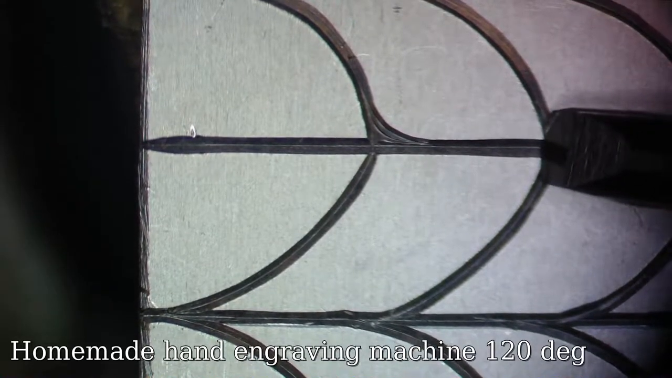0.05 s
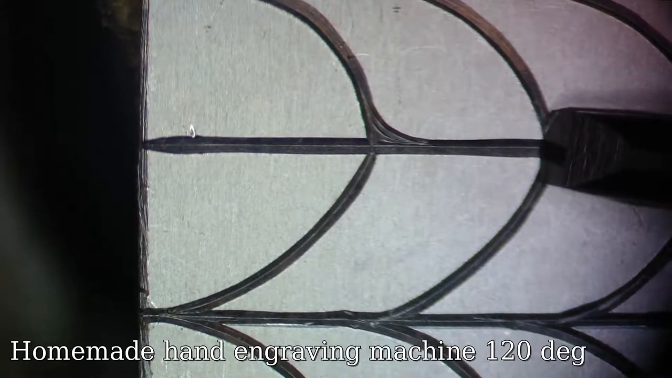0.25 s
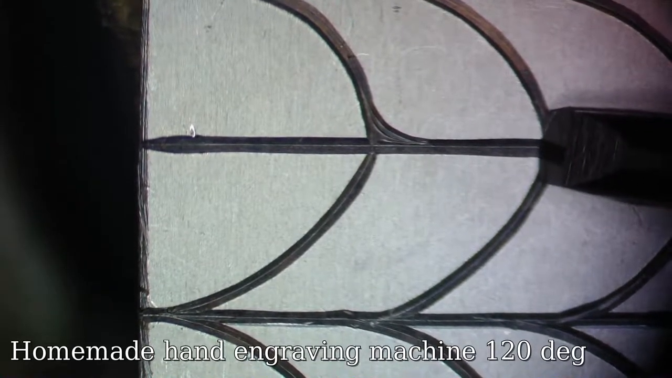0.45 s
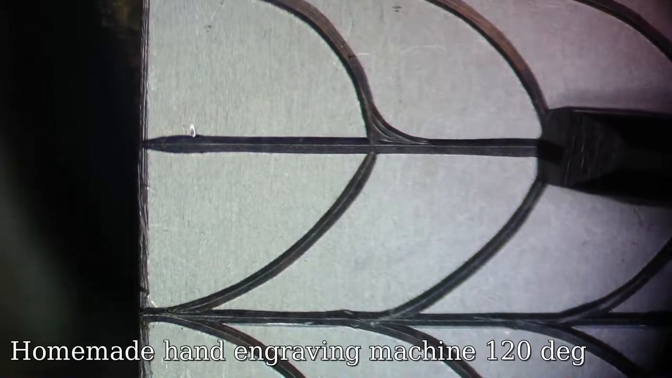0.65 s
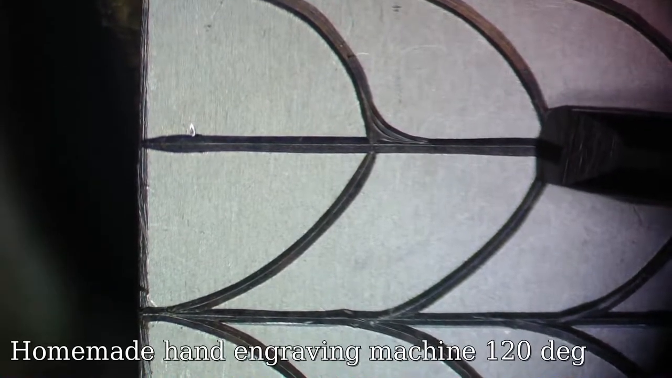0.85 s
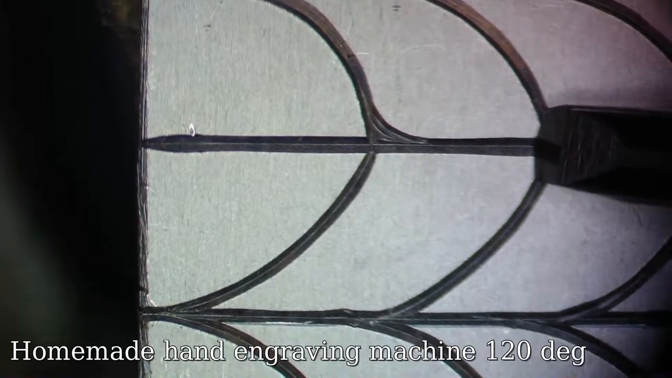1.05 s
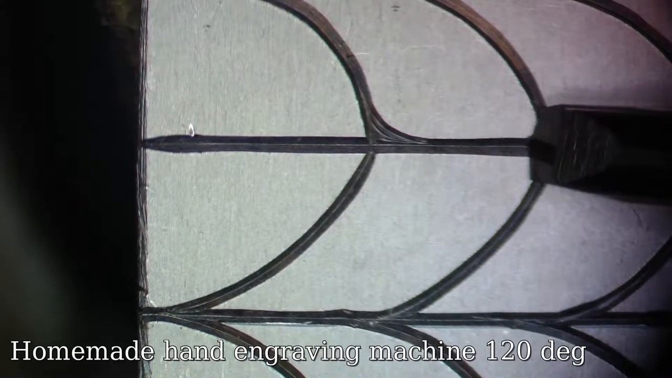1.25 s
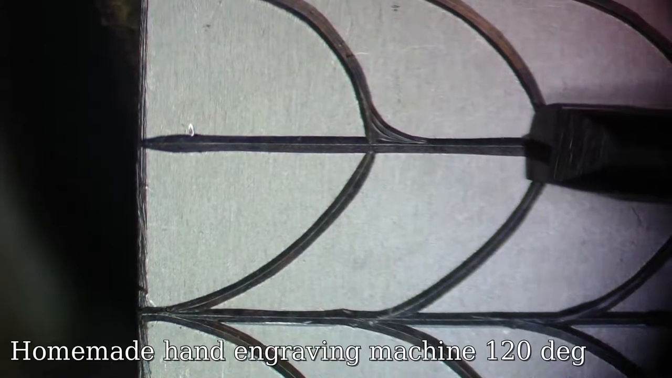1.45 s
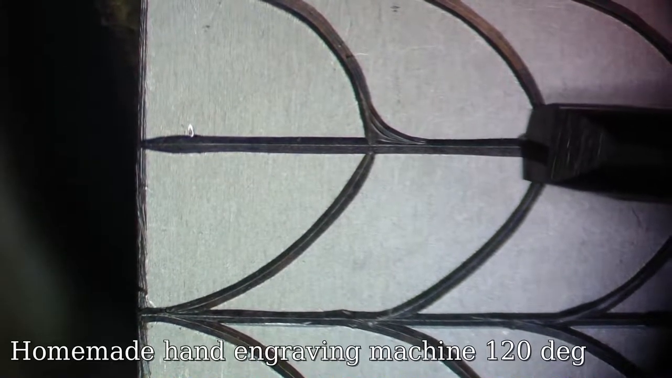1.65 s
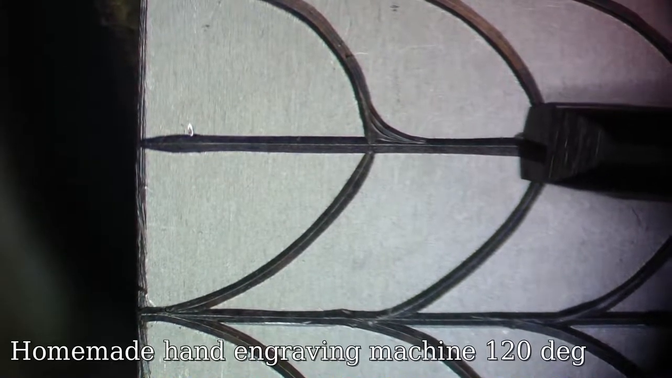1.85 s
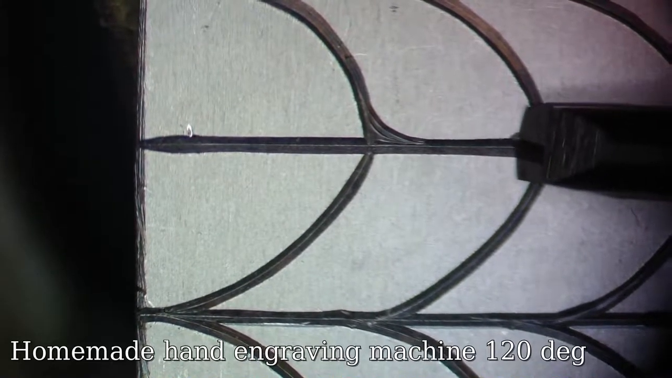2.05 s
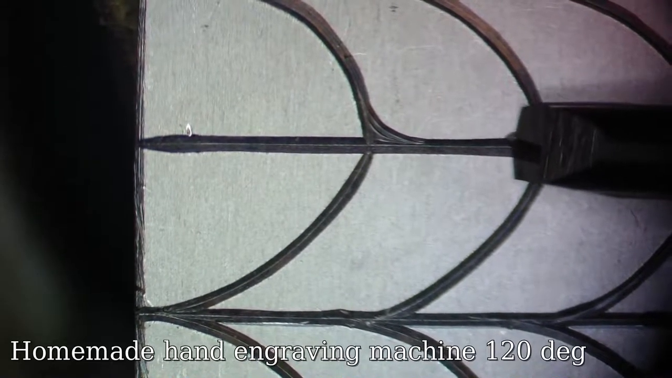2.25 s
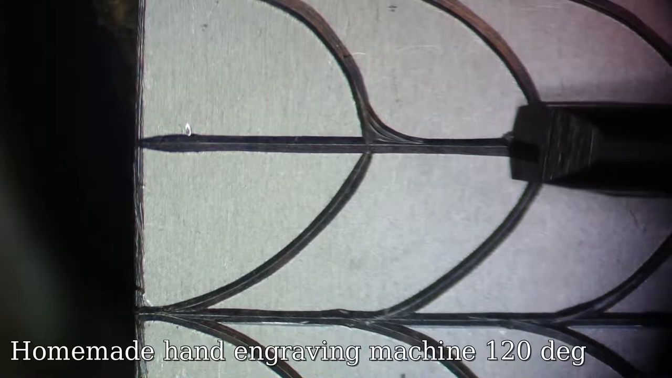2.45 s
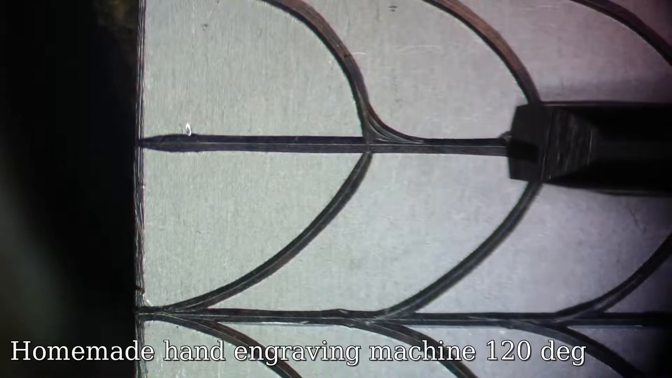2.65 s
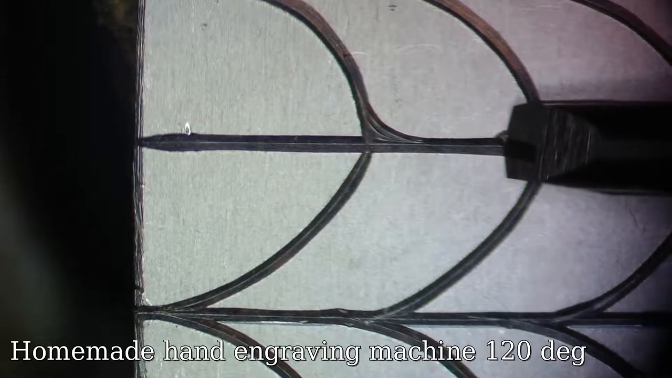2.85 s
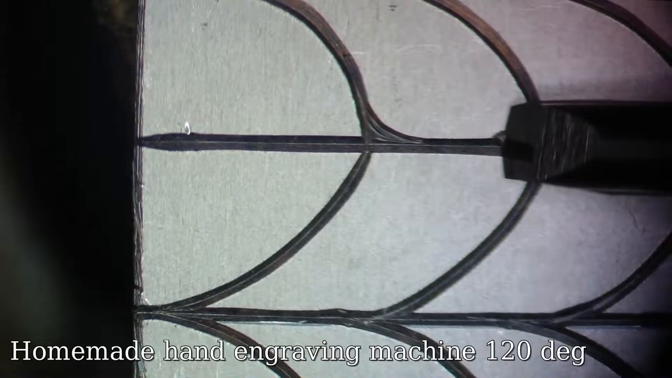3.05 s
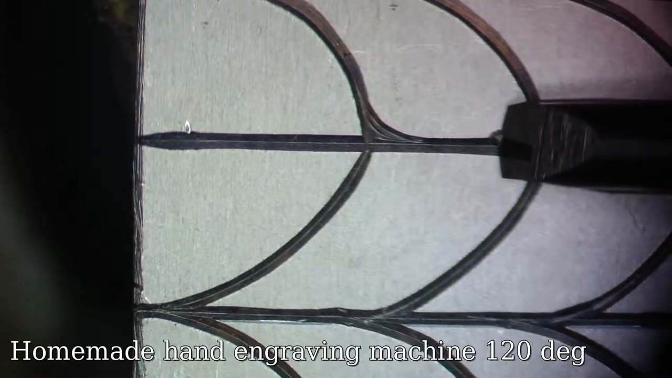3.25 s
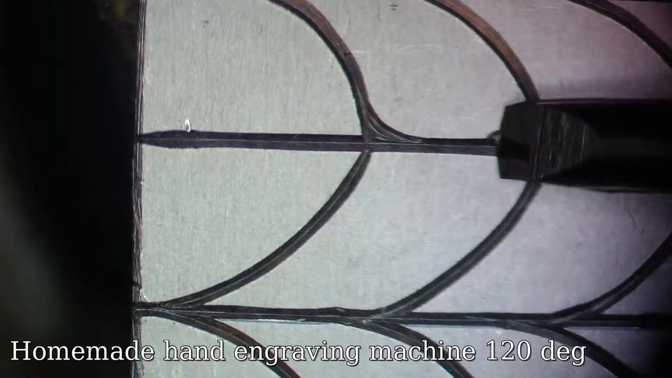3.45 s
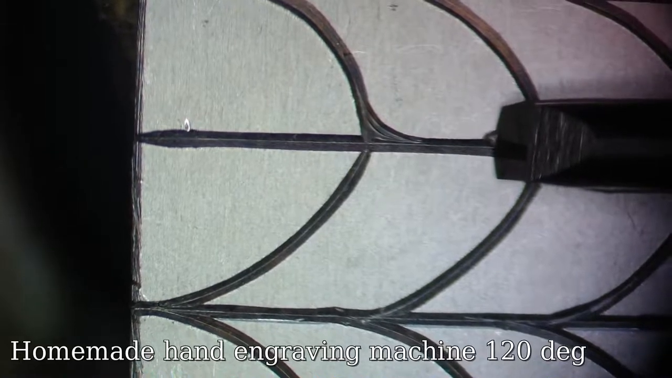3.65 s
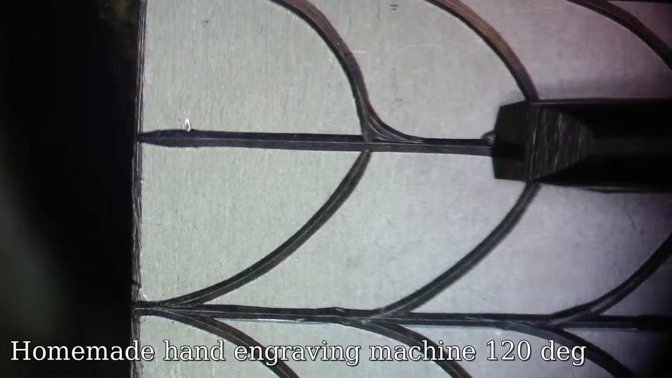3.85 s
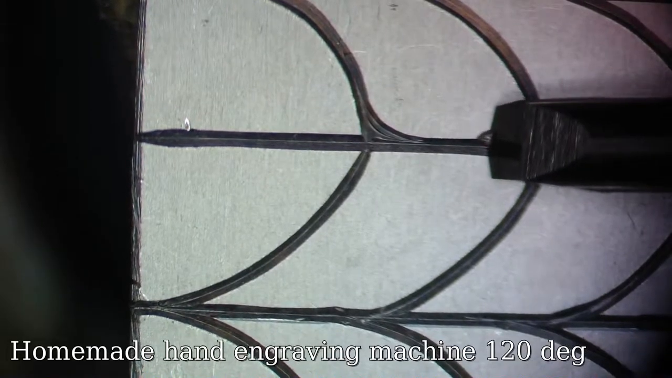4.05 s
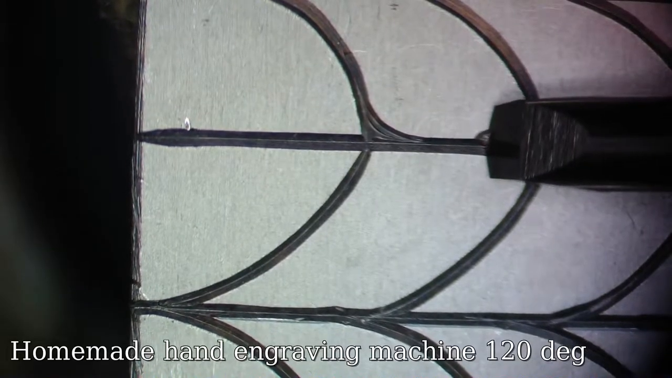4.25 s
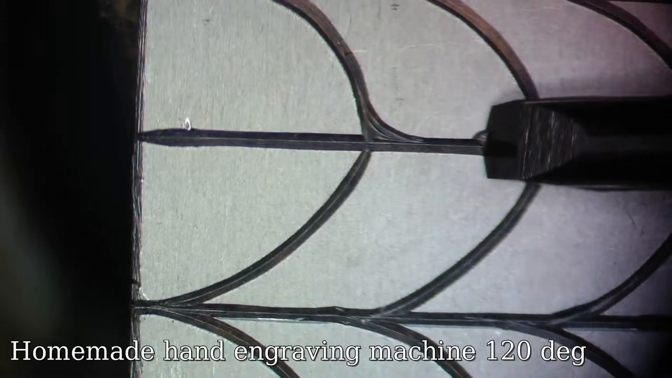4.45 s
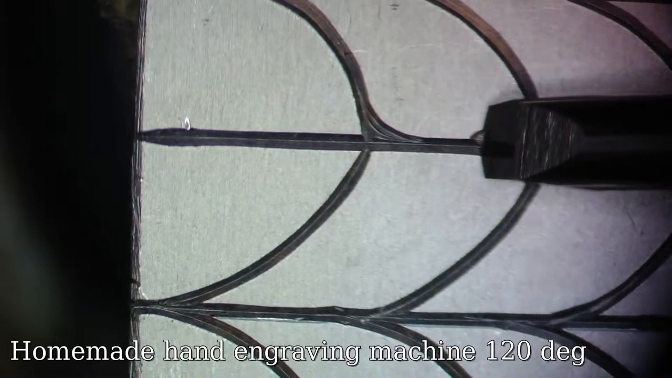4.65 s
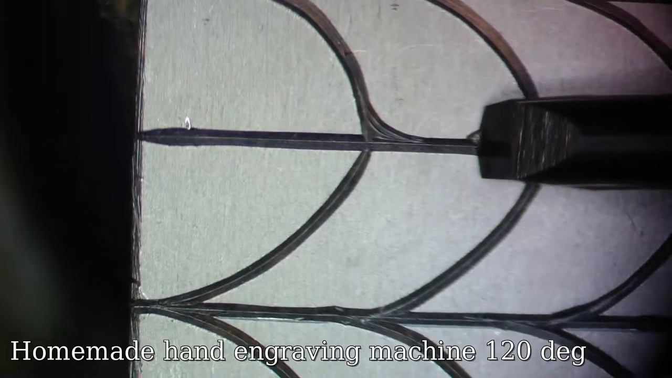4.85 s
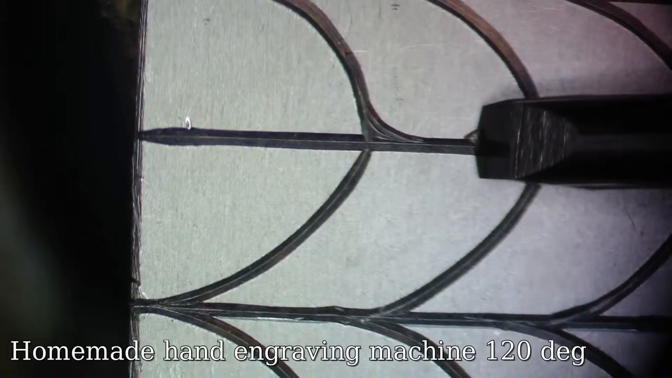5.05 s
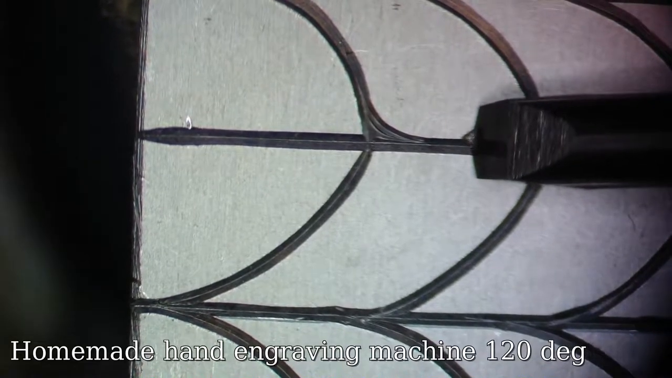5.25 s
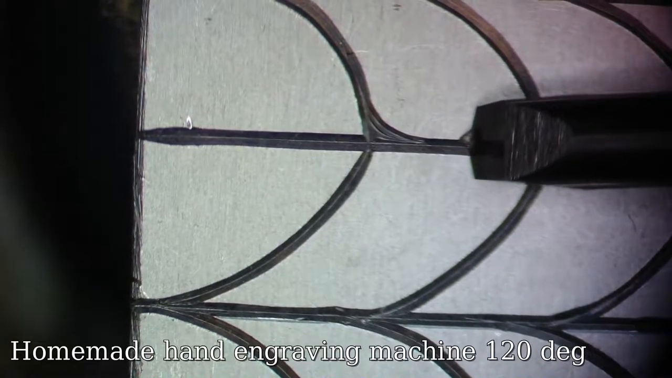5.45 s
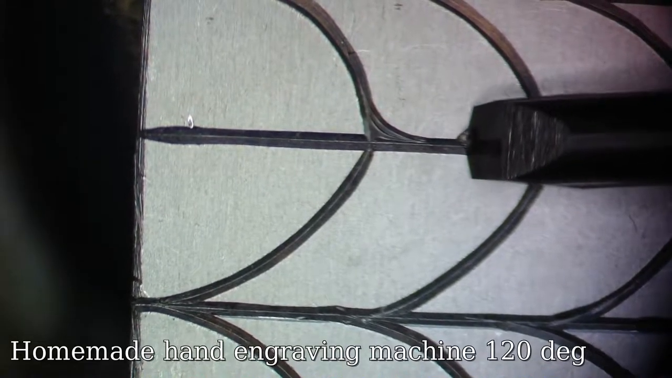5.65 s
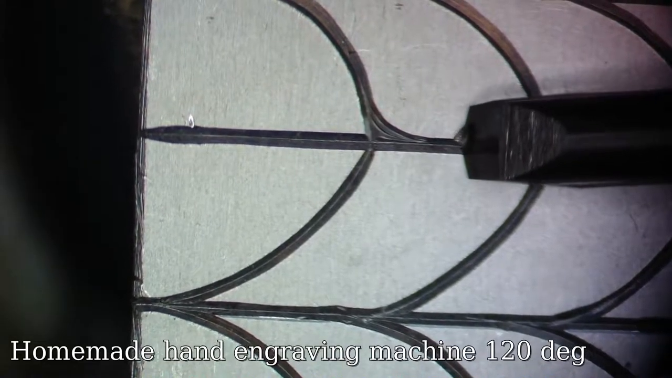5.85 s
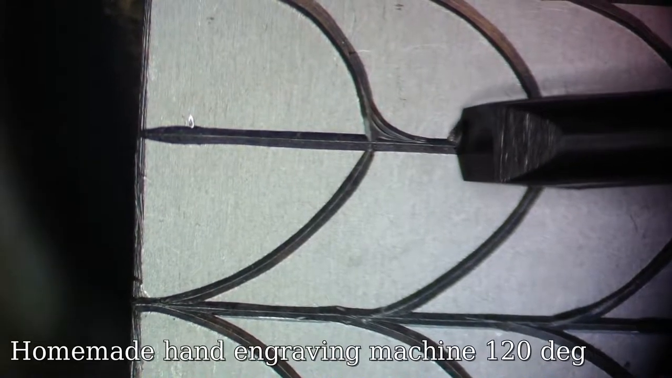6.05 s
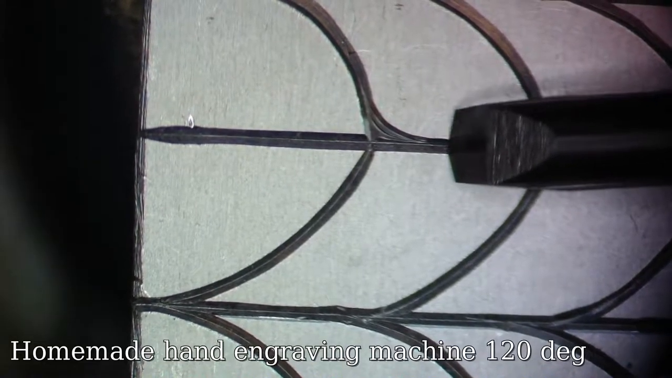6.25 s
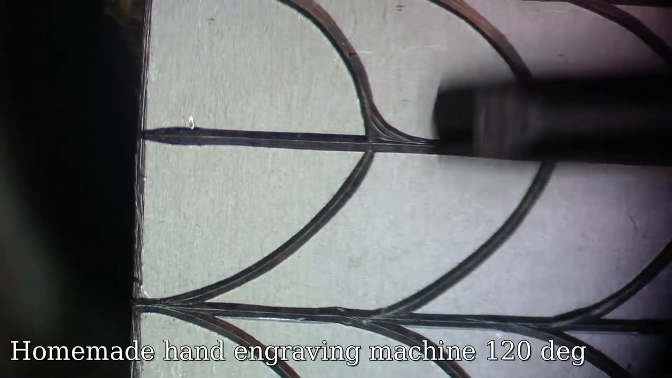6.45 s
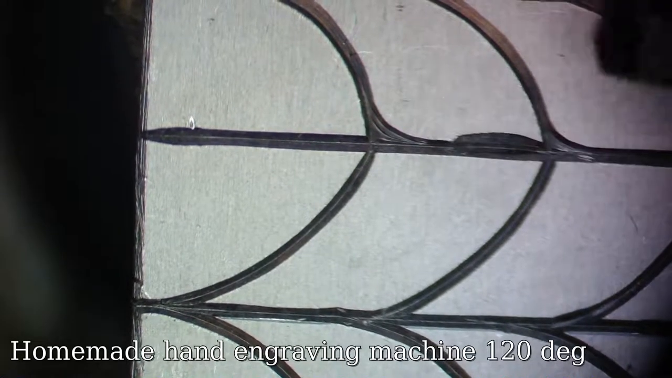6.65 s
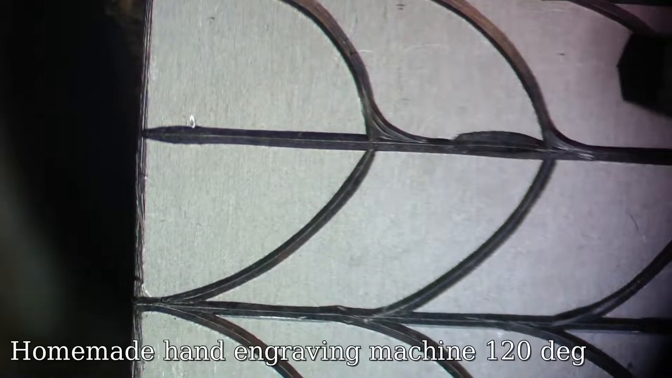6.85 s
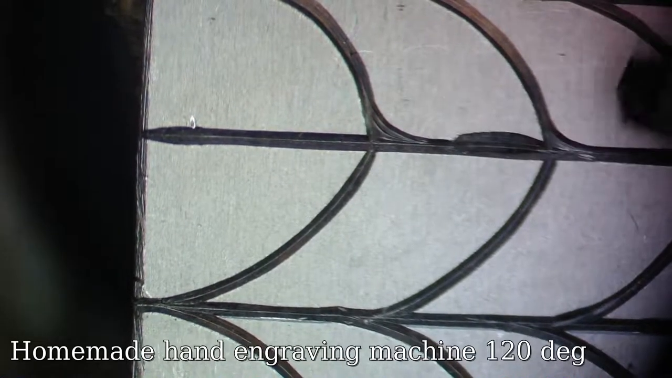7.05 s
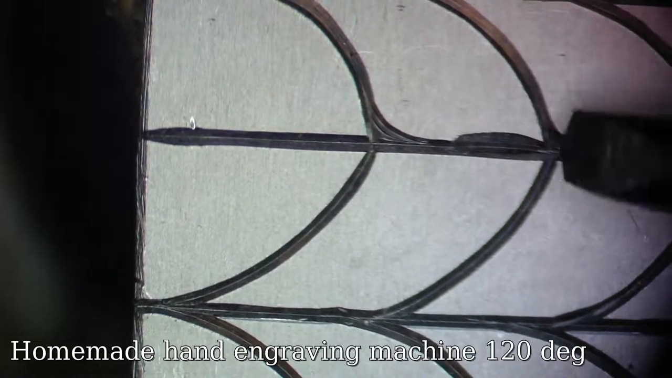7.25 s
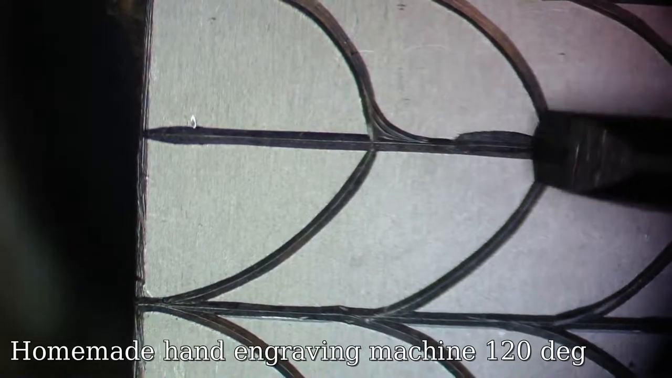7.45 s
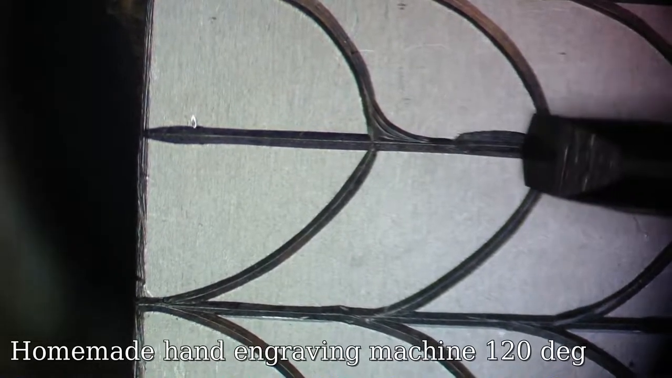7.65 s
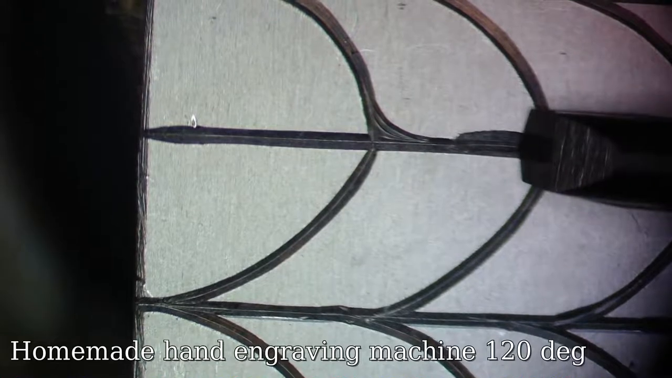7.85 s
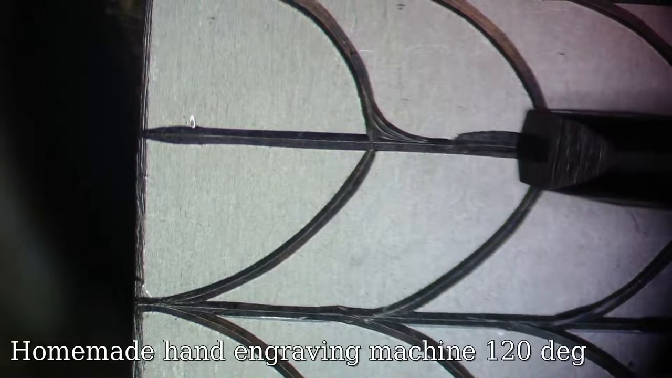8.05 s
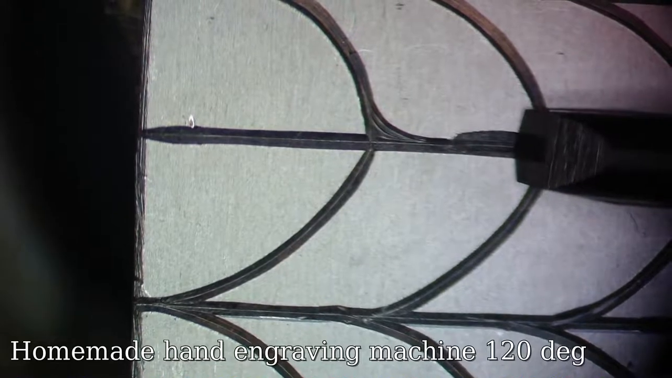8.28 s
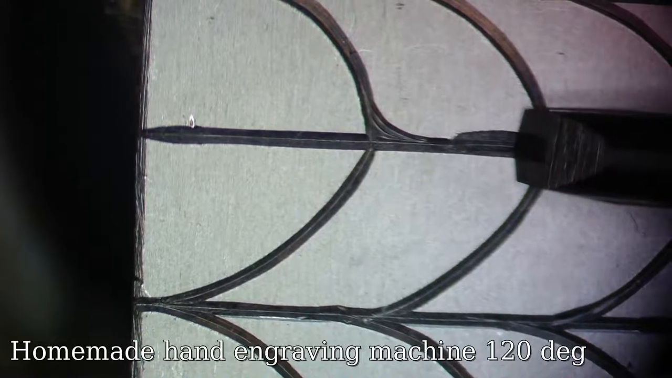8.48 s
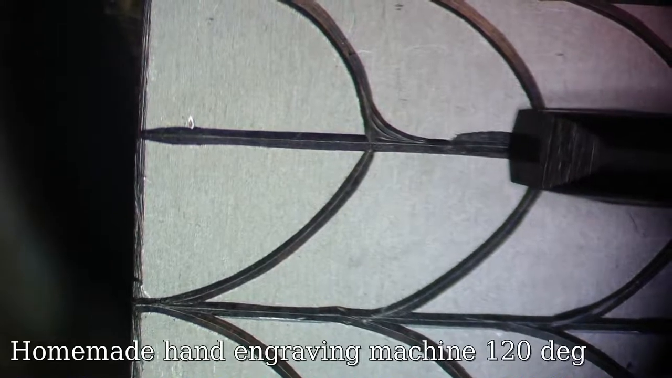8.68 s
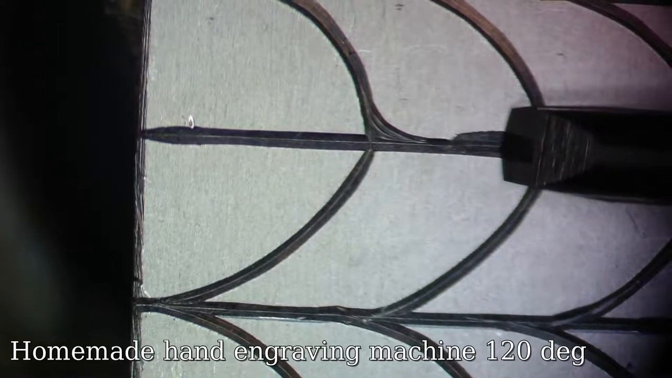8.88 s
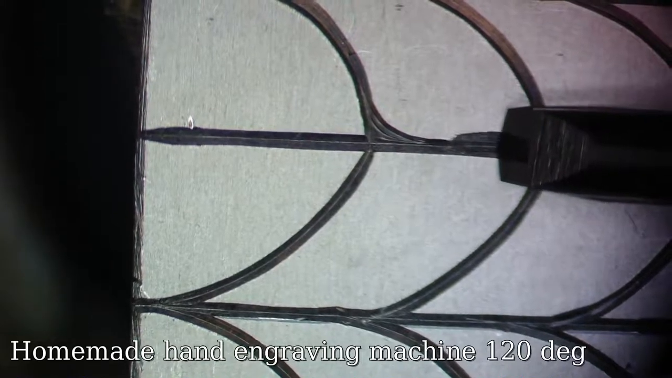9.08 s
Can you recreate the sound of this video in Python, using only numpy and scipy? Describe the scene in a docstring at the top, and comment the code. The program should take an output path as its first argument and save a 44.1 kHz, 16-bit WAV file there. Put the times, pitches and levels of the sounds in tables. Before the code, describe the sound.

Close, sharp hammering of a motor-driven engraver on steel accelerates to a rattling buzz, pauses and resumes slowly, with mains hum underneath.

```python
"""A motor-driven engraving handpiece hammers a graver into a steel plate, close up at a workshop bench.
A cam throws a piston, which strikes, bounces, slides back and rattles on its stop, ringing tool, plate
and vice. The pedal speeds it up, lets it stop and starts it again. The mono microphone, on the left
input, also catches the motor's drone, a short room tail and mains hum; the open right input only hisses."""
import sys
import numpy as np
from scipy import signal
from scipy.fft import rfft, irfft, next_fast_len
from scipy.io import wavfile
from scipy.ndimage import uniform_filter1d

SR = 44100
rng = np.random.default_rng(int(sys.argv[2]) if len(sys.argv) > 2 else 0)


def to_wav(sig):
    """Store sig (one row per channel, or 1-D mono) as 16-bit WAV at the path in sys.argv[1].

    Samples outside -1..1 are clipped; the rate is SR.
    """
    pcm = np.clip(np.atleast_2d(sig), -1, 1) * 32767
    pcm = np.round(pcm).astype(np.int16)
    wavfile.write(sys.argv[1], SR, pcm.T)  # frames by channels


N = 402191


def amp(db):
    """Gain of a level in dB."""
    return 10 ** (np.asarray(db) / 20)

def along(points, hz):
    """Read (frequency, value) points along a log frequency axis."""
    f, value = np.transpose(points)
    return np.interp(np.log(hz + 1), np.log(f + 1), value)

def columns_at(table, times):
    """Read each column of a timed table at the given times."""
    at, *columns = np.transpose(table)
    return [np.interp(times, at, column) for column in columns]

def filtered(x, response):
    """Pass x through a complex frequency response."""
    size = next_fast_len(N + SR // 2)
    return irfft(rfft(x, size) * response(np.fft.rfftfreq(size, 1 / SR)), size)[..., :N]


# Noise floor of the microphone input and of the open input: (frequency [Hz], density [dB per Hz])
HISS_LEFT = [(20, -63.5), (32, -75.5), (40, -97), (90, -82.5), (300, -87.5), (600, -95.5), (2000, -100),
             (5000, -105), (15300, -106), (16000, -125)]
HISS_RIGHT = [(20, -88), (75, -101.5), (300, -101), (1000, -106), (4000, -111), (15000, -116),
              (16000, -135)]

def hiss():
    """Each input's amplifier adds its own unrelated noise."""
    colour = lambda hz: np.sqrt(SR / 2) * amp([along(HISS_LEFT, hz), along(HISS_RIGHT, hz)])
    return filtered(rng.standard_normal((2, N)), colour)


MAINS_HZ = 50.132
# Hum on the microphone line: (harmonic [number], level [dB])
HUM = [(1, -39), (2, -63), (3, -55), (5, -59), (7, -75), (9, -67), (11, -77), (13, -71), (15, -73),
       (17, -74), (19, -75), (23, -75), (27, -81), (35, -81)]

def hum():
    """The cable picks up the mains and its mostly odd harmonics."""
    phase = 2 * np.pi * MAINS_HZ * np.arange(N) / SR
    starts = 2 * np.pi * rng.random(len(HUM))
    harmonics = sum(amp(db) * np.sin(k * phase + start) for (k, db), start in zip(HUM, starts))
    return amp(0.25) * np.sqrt(2) * harmonics


FULL_RATE_HZ = 23.15
# Cam speed, one list for each press of the pedal: (time [s], rate [turns per s])
PEDAL_RUNS = [
    [(0.0271, 6.585), (0.25, 6.484), (0.33, 10.84), (0.41, 9.26), (0.72, 13.964), (0.84, 14.885),
     (0.96, 17.77), (1.3, 19.69), (1.56, 19.495), (1.73, 20.778), (2.59, 20.794), (2.83, 23.1),
     (5.8, 23.188), (5.96, 21.434), (6.17, 20.132), (6.3, 13.108)],
    [(8.4034, 8.199), (8.57, 12.263), (8.75, 12.546), (8.92, 13.808), (9.12, 13.508)],
]

def cam():
    """The cam's rate adds up to turns: (times, turns so far) for each run."""
    spans = [np.arange(run[0][0], run[-1][0], 1 / SR) for run in PEDAL_RUNS]
    return [(t, np.cumsum(np.interp(t, *np.transpose(run))) / SR) for t, run in zip(spans, PEDAL_RUNS)]

def blow_times():
    """One blow as each run starts, then one for every whole turn of the cam."""
    return np.concatenate([np.interp(np.arange(int(turns[-1]) + 1), turns, t) for t, turns in cam()])

def speed_and_turns():
    """The cam's smoothed motion: speed as a share of the full rate, and turns so far."""
    turns = sum(np.interp(np.arange(N) / SR, t, made) for t, made in cam())
    turns = uniform_filter1d(turns, SR // 10, mode="nearest")
    return abs(np.gradient(turns)) * SR / FULL_RATE_HZ, turns


# Modes of the metal parts at the bench: (frequency [Hz], width [Hz], level [dB])
PLATE = [(1138, 315, -4.5), (1652, 263, -2), (3866, 1880, -2)]
BARREL = [(4580, 260, 0)]
GRAVER = [(5480, 560, 0.5), (6265, 234, -1), (6830, 205, 4), (7860, 1600, -4.5)]
SPRING = [(10400, 900, 0)]
PISTON = [(9150, 360, 2.5), (10940, 254, 3.5), (11950, 1960, 0)]
COLLET = [(14600, 1640, -2.5), (15250, 700, 0.5)]
VICE = [(2200, 860, -5), (2870, 316, -0.05)]
PARTS = PLATE, BARREL, GRAVER, SPRING, PISTON, COLLET, VICE  # the order of every per-part list

def ringing(f):
    """Each part's resonant response, with energy 1; neighbouring modes swing in opposite sense."""
    ladder = sorted(hz for part in PARTS for hz, width, db in part)
    response = np.array([sum((-1) ** ladder.index(hz) * amp(db) * resonance(f, hz, width)
                             for hz, width, db in part) for part in PARTS])
    return response / np.sqrt(np.mean(abs(response) ** 2, axis=1, keepdims=True))

def resonance(f, hz, width):
    """Band-pass response of one damped mode."""
    return 1j * f * width / (hz * hz - f * f + 1j * f * width)

def knocks(times, part_db, rough, crack_ms):
    """Force on each part: a sharp push plus a short random crack at every contact."""
    t = np.arange(64) / SR
    crack = rng.standard_normal((len(times), len(t))) * np.exp(-t / (crack_ms / 1000))
    shape = rough * crack / np.linalg.norm(crack, axis=1, keepdims=True) + (t == 0)
    onsets = np.round(np.clip(times, 0, None) * SR).astype(int)
    at = (onsets[:, None] + np.arange(len(t))).ravel()
    return np.array([np.bincount(at, (shape * amp(db)[:, None]).ravel(), N + SR)[:N] for db in part_db])


FAINT_DB, FAINT_LEAD_S = -26, [0.014, 0.007]  # two faint ticks ahead of a blow
TICK_BARREL_DB, CLINK_BARREL_DB = -13, 3  # barrel over piston
TICK_KNOCK_DB, CLINK_KNOCK_DB = -13, -2  # plate and vice over piston
# Clear ticks of the loose piston at low speed: (time [s], level [dB])
TICKS = [(0.0077, -13.5), (0.1304, -11), (0.1614, -11.5), (0.2629, -10.5), (0.307, -17.5), (0.3795, -9.5),
         (0.478, -10), (0.5718, -8.5), (0.6595, -8), (0.7392, -6), (0.804, -8.5), (0.8727, -10),
         (0.9343, -20.5), (0.9902, -16), (6.0213, -16.5), (6.0642, -16.5), (6.1175, -20), (6.1617, -24),
         (6.2143, -21.5), (6.223, -21.5), (6.274, -16), (6.282, -14), (6.3618, -15), (6.3646, -15),
         (6.3725, -13), (6.3837, -18), (6.4036, -17), (6.4075, -14), (6.4175, -14), (6.4245, -17),
         (6.436, -20), (8.3498, -22), (8.3523, -13), (8.3883, -15.5), (8.4726, -15), (8.4798, -20),
         (8.5675, -18), (8.573, -14.5), (8.5831, -19), (8.6516, -12.5), (8.6585, -15), (8.735, -11),
         (8.746, -16), (8.8161, -8), (8.8267, -20), (8.8619, -12), (8.8981, -11), (8.9017, -20),
         (8.9278, -11), (9.038, -13), (9.041, -14.5), (9.1082, -8.5)]
# Fuller clinks of the barrel as the piston comes to rest: (time [s], level [dB])
CLINKS = [(6.3165, -20), (6.324, -22), (6.4452, -9), (6.4904, -16)]
# Tick colour as the grip changes, against the piston: (time [s], spring [dB], collet [dB], graver [dB])
TICK_COLOUR = [(1.0, -1, -13, -5), (5.5, 0, -7, -16), (6.1, -4, -8, -13), (6.5, -6.5, 1, -4.5),
               (8.3, -15, -7.5, -6)]

def rattles():
    """The returning piston ticks on its stop: clearly when slow, faintly at speed."""
    hits = blow_times()[1:]
    chance = rng.standard_normal((len(hits), 2, 2))
    faint_times = hits[:, None] - FAINT_LEAD_S + .0016 * chance[:, 0]
    faint_db = FAINT_DB + 3.5 * chance[:, 1]
    times, db = np.transpose(np.r_[CLINKS, TICKS, np.c_[faint_times.ravel(), faint_db.ravel()]])
    shiver = rng.standard_normal((len(times), 4))
    spring_db, collet_db, graver_db = columns_at(TICK_COLOUR, times)
    collet_db += 3 * shiver[:, 3]
    is_clink = np.arange(len(times)) < len(CLINKS)
    barrel_db = np.where(is_clink, CLINK_BARREL_DB, TICK_BARREL_DB + 4 * shiver[:, 2])
    knock_db = np.where(is_clink, CLINK_KNOCK_DB, TICK_KNOCK_DB)
    over_piston = np.array([knock_db, barrel_db, graver_db, spring_db, 0 * times, collet_db, knock_db])
    part_db = db + over_piston - over_piston.max(axis=0) - 5  # the strongest part sets the level
    chatter_db = part_db - 7 - 20 * is_clink + 3 * shiver[:, 1]  # a softer contact beside each tick
    chatter = knocks(times + .006 * shiver[:, 0], chatter_db, rough=.8, crack_ms=.4)
    return knocks(times, part_db, rough=.7, crack_ms=.2) + chatter


# Grip and cut at the plate: (time [s], strength [dB], graver ring [dB], spring lift [dB])
CUT = [(0.03, -19, 3, 5), (0.18, -18, 0.5, 4.5), (0.32, -16, -6, 6.5), (0.42, -20.5, 2.5, 4),
       (0.65, -20.5, 5, 4.5), (0.9, -15.5, 0.5, 1.5), (1.2, -13.5, 1.5, 5.5), (2.0, -12, 5.5, -0.5),
       (2.8, -10.5, 6, -2.5), (4.8, -11, 6, -1), (5.2, -11, 4, -6), (5.5, -10.5, 4, -7.5),
       (5.7, -11, 0, -0.5), (5.8, -11.5, -1.5, -2), (5.9, -14.5, -2.5, 2), (6.15, -14, -2.5, 0),
       (6.3, -18.5, -3, 0), (8.4, -18.5, -4, -2), (8.6, -21, -1.5, -2), (9.05, -18, 1, -1)]
# For each part: (level against the blow's strength [dB])
SHARE_DB = [-1.5, 3, -1.5, -0.5, 0.5, 4.5, -8]
# For each part: (level change [dB per dB of graver ring])
FOLLOWS_RING = [-0.13, -0.25, 0.71, 0.3, 0.74, -0.43, -0.55]

def grip(times):
    """Level in dB of each part; the less the graver rings, the more barrel and vice speak."""
    strength_db, ring_db, spring_db = columns_at(CUT, times)
    is_spring = np.array([part is SPRING for part in PARTS])[:, None]
    colour_db = np.outer(FOLLOWS_RING, ring_db) + is_spring * spring_db
    return strength_db + colour_db + np.array(SHARE_DB)[:, None]


UNEVEN_DB = 0.6  # scatter from blow to blow
# The strike and its two bounces: (delay [ms], level [dB], time scatter [ms], treble tilt [dB per step])
CONTACTS = [(0, 0, 0, 0), (6.0, -9.5, .22, 1.3), (8.5, -16, .6, 1)]

def blows():
    """The piston strikes much alike each turn; its bounces vary and come later when the cam is slow."""
    times = blow_times()
    delay_ms, level_db, scatter, tilt_db = np.transpose(CONTACTS)
    period = np.clip(np.gradient(times), 0, .15)[:, None]
    chance = rng.standard_normal((len(times), 3, len(delay_ms)))
    late_ms = delay_ms * (1 + 2.5 * (period - 1 / FULL_RATE_HZ)) + scatter * chance[:, 0]
    contact_db = UNEVEN_DB * chance[:, 2, :1] + level_db + 4 * scatter * chance[:, 1] + 14
    treble_steps = np.array([-2, -1, 0, 1, 2, 3, -1])[:, None, None]
    part_db = contact_db + grip(times)[:, :, None] + treble_steps * tilt_db
    strikes = knocks(times, part_db[..., 0], rough=.24, crack_ms=.3)
    bounce_times = (times[:, None] + late_ms / 1000)[:, 1:].ravel()
    bounce_db = part_db[..., 1:].reshape(len(PARTS), -1)
    return strikes + knocks(bounce_times, bounce_db, rough=.6, crack_ms=.35)


THIN_HZ = 846  # the small tool radiates little below this
# From tool to close microphone, direct and off hand, vice, bench and wall:
# (delay [ms], level [dB], signed gain [ratio], dull above [Hz])
MIC_PATHS = [(.55, 2, -0.95, 8040), (.75, 9, 0.88, 6800), (1.1, 4, 0.69, 13000), (1.55, 4.5, 0.53, 25000),
             (2.4, -11.5, -0.22, 13200), (3.1, -8.5, -0.52, 18000), (12.8, -30, 1, 3800)]

def mic_paths(f):
    """Every blow reaches the microphone as the same few delayed, dulled copies."""
    thin = -f * f / (THIN_HZ ** 2 - f * f + 1.2j * f * THIN_HZ)
    return thin * sum(gain * amp(db) * np.exp(-2j * np.pi * f * ms / 1000) / (1 + (f / dull_hz) ** 4)
                      for ms, db, gain, dull_hz in MIC_PATHS) / 2


# A lone dry slide of the piston as the motor creeps: (time [s], level [dB])
CREEP = [(8.2, -78), (8.235, -61), (8.27, -41.5), (8.305, -43.5), (8.318, -75), (8.35, -47.5)]

def slide():
    """After each blow the piston rubs back along the barrel; a lighter rub grows with speed."""
    t = np.arange(N) / SR
    hits = blow_times()
    last_hit = hits[np.clip(np.searchsorted(hits, t) - 1, 0, None)]
    since = np.clip(t - last_hit, 0, None)
    stroke = np.clip(since / .006, 0, 1) / (1 + (since / .024) ** 5)  # lasts some 25 ms
    rub = amp(-32) * stroke + amp(-42.5) * speed_and_turns()[0] ** 0.36
    part_db = grip(t) + np.array([2.5, 1.0, 3.5, 0.5, 1.0, 1.5, 10])[:, None]
    creep_db = np.interp(t, *np.transpose(CREEP), left=-120, right=-120)
    creep = amp(creep_db + np.array([-19, -4, -9, -26, -15, -11, -18.5])[:, None])
    return (rub * amp(part_db) + creep) * rng.standard_normal((len(PARTS), N))


# Motor drone at the microphone at full speed: (multiple of the blow rate [number], level [dB rms])
DRONE = [(1, -57), (3, -57), (5, -65), (6, -61), (7, -55), (8, -60), (10, -64), (11, -63), (12, -54),
         (16, -68), (21, -64), (26, -67)]

def motor():
    """A drone locked to the cam and a low rumble of the bearings, both louder with speed."""
    speed, turns = speed_and_turns()
    knots = rng.standard_normal((len(DRONE), 90))
    position = np.linspace(0, knots.shape[1] - 1, N)
    wavers = [0.2 * np.interp(position, np.arange(len(row)), row) for row in knots]
    drone = sum(amp(db) * np.sin(2 * np.pi * k * turns + waver) for (k, db), waver in zip(DRONE, wavers))
    rumble = filtered(rng.standard_normal(N), lambda f: resonance(f, hz=350, width=260))
    rumble *= 1 + 0.66 * np.cos(2 * np.pi * (turns - 0.1))  # loudest just after each blow
    return np.sqrt(2) * speed ** 4.2 * drone + amp(-35) * speed ** 1.3 * rumble


# The workshop around the bench: (frequency [Hz], time to fall 60 dB [s])
ROOM_DECAY = [(300, .16), (2500, .14), (8000, .1), (16000, .08)]

def room(x, tail_count):
    """A short room tail, dying soonest in the treble; each blow uses one of several random tails."""
    hz, t, noise = signal.stft(rng.standard_normal((tail_count, SR // 2)), SR, nperseg=256)
    decay = amp(-60 * t / along(ROOM_DECAY, hz)[:, None])
    tails = signal.istft(noise * decay, SR, nperseg=256)[1]
    starts = blow_times() - .002
    tail_choice = rng.integers(0, tail_count, len(starts) + 1)[np.searchsorted(starts, np.arange(N) / SR)]
    by_tail = x * (tail_choice == np.arange(tail_count)[:, None])
    wet = signal.fftconvolve(by_tail, tails / np.linalg.norm(tails[0]), axes=1).sum(axis=0)
    return np.pad(wet, (220, 0))[:N]  # arrives 5 ms late


def scene():
    """Tool, motor, room and hum reach the left input only; both inputs hiss."""
    struck = filtered(blows(), ringing).sum(axis=0)
    loose = filtered(rattles() + slide(), ringing).sum(axis=0)
    left = filtered(struck, mic_paths) + loose + motor() + hum()
    left += amp(-17) * room(struck + 2 * loose, tail_count=6)
    return hiss() + left * [[1], [0]]


TOP_HZ = 16650

def record(dry):
    """The inputs clip softly at full scale and are band-limited."""
    clipped = dry / (1 + abs(dry) ** 8) ** (1 / 8)
    return np.clip(filtered(clipped, lambda hz: hz < TOP_HZ), -1, 1)


dry = scene()
out = record(dry)
to_wav(out)
```